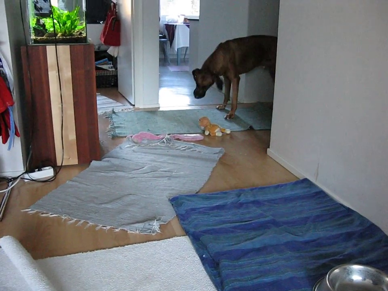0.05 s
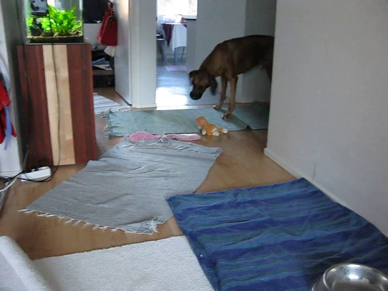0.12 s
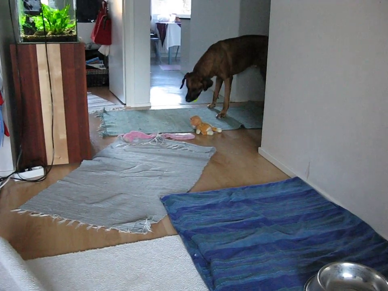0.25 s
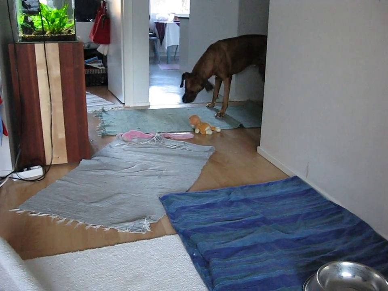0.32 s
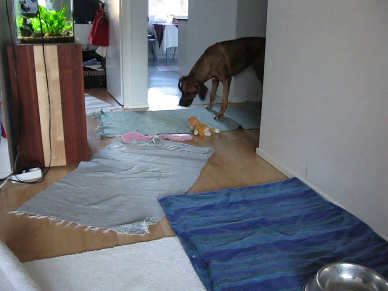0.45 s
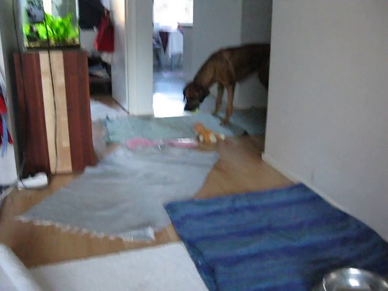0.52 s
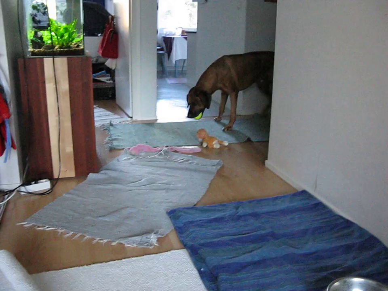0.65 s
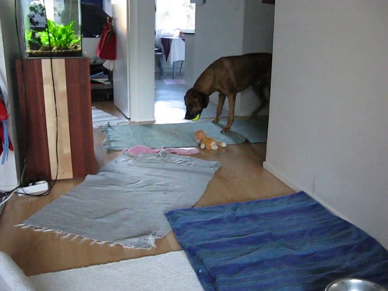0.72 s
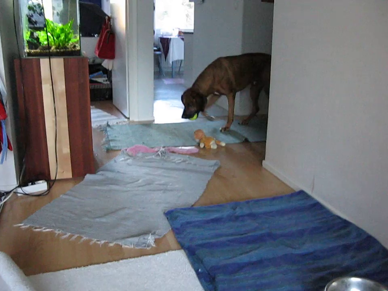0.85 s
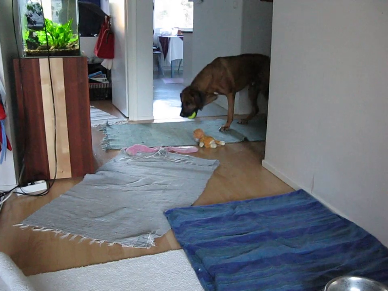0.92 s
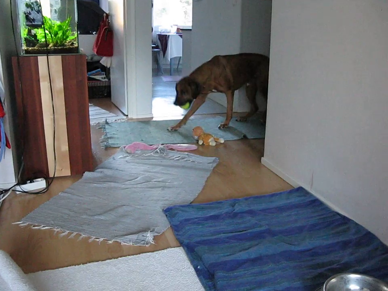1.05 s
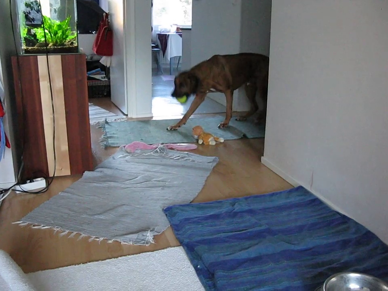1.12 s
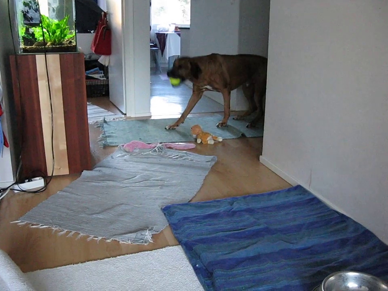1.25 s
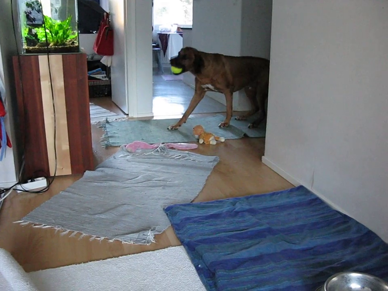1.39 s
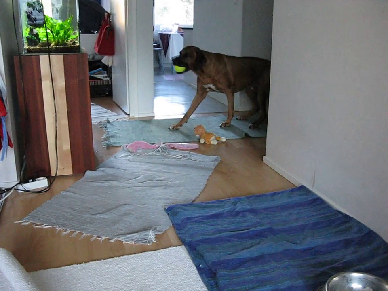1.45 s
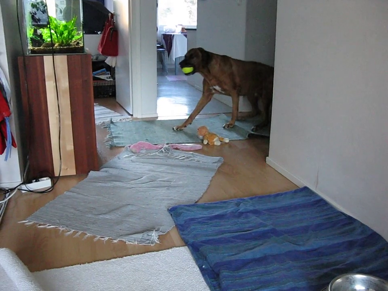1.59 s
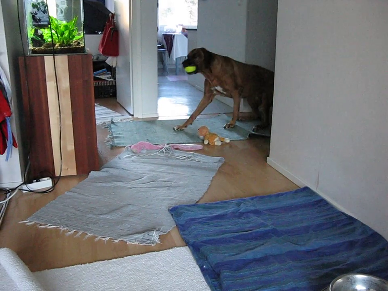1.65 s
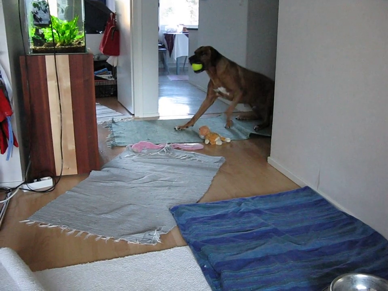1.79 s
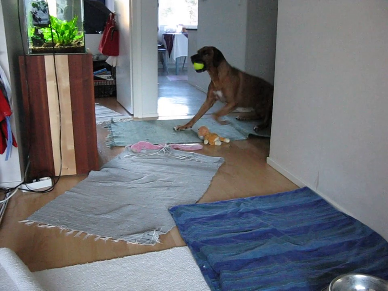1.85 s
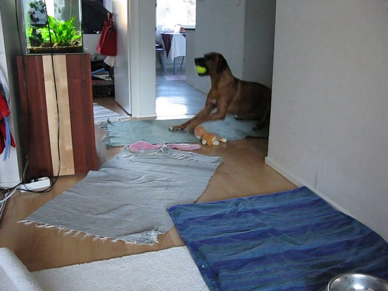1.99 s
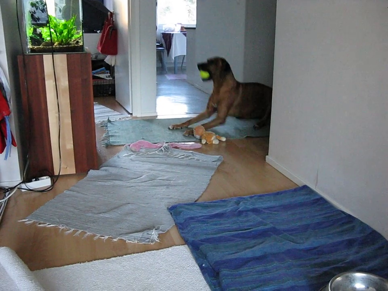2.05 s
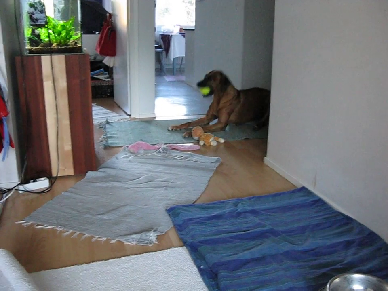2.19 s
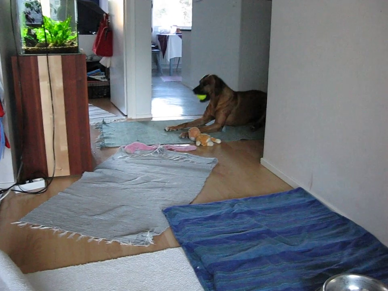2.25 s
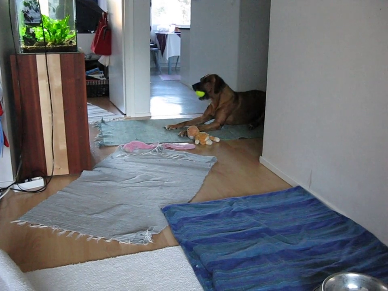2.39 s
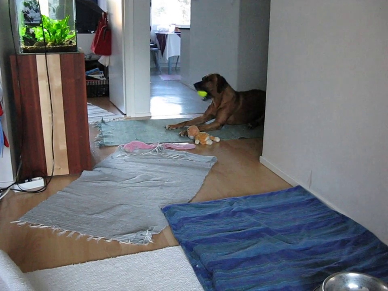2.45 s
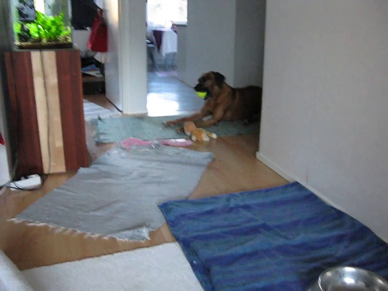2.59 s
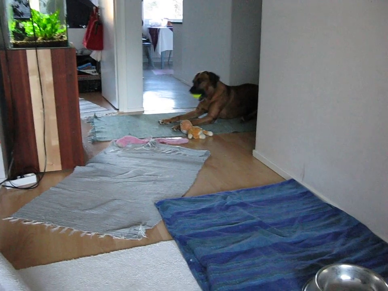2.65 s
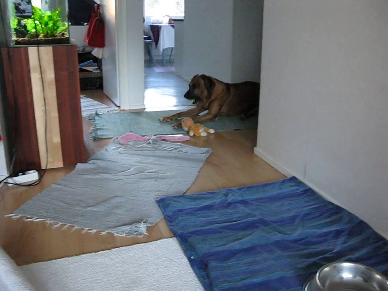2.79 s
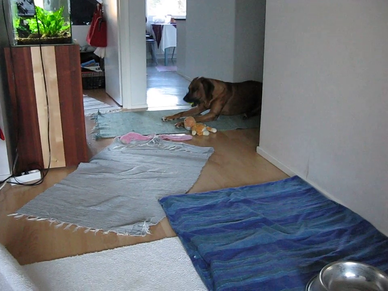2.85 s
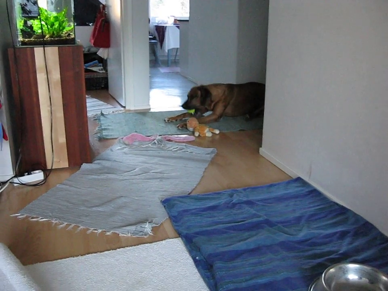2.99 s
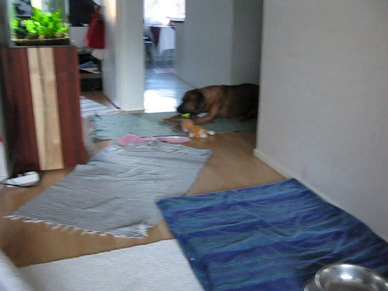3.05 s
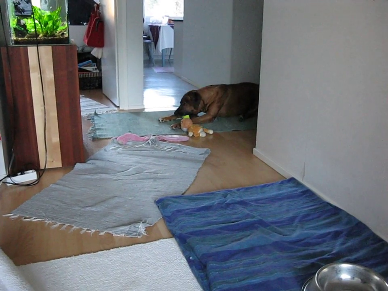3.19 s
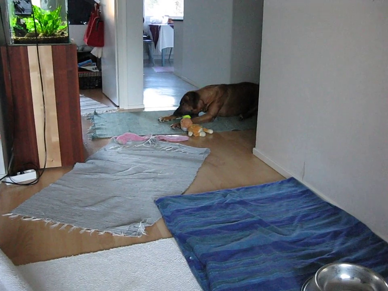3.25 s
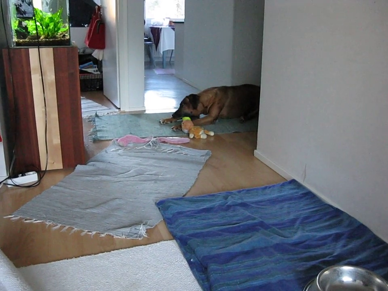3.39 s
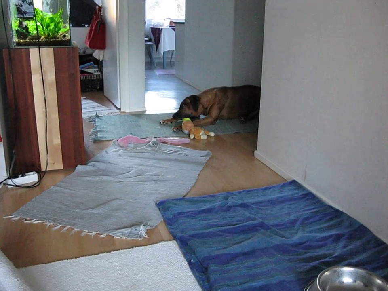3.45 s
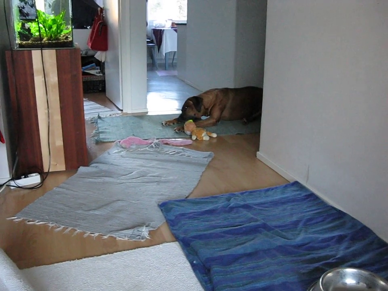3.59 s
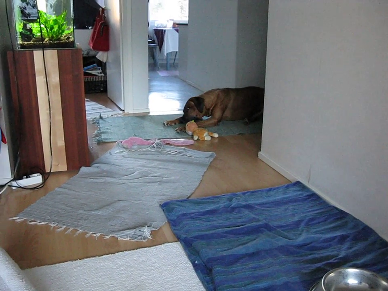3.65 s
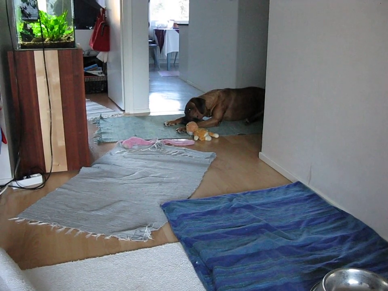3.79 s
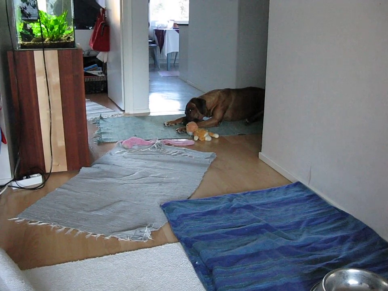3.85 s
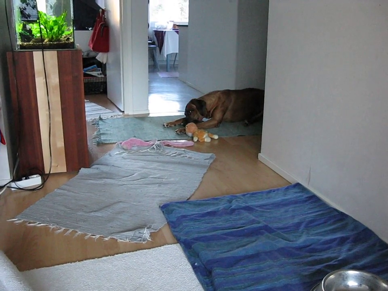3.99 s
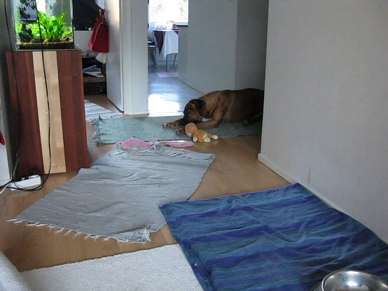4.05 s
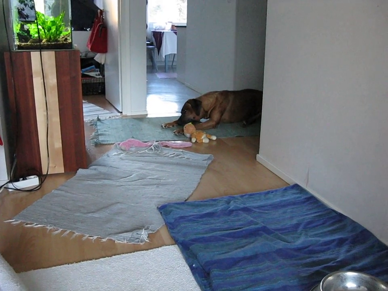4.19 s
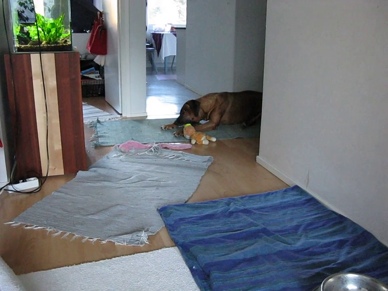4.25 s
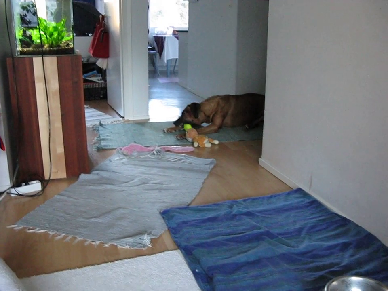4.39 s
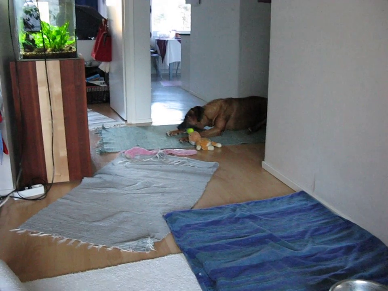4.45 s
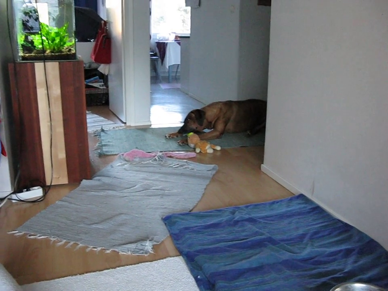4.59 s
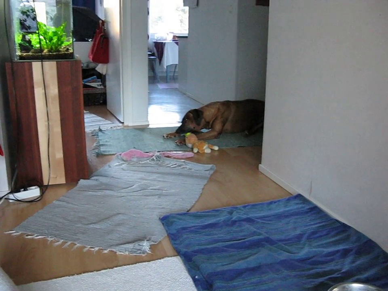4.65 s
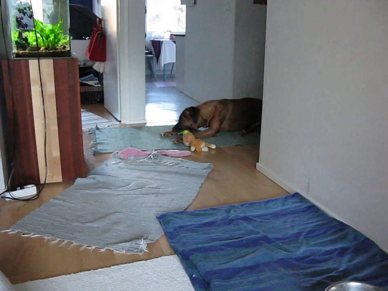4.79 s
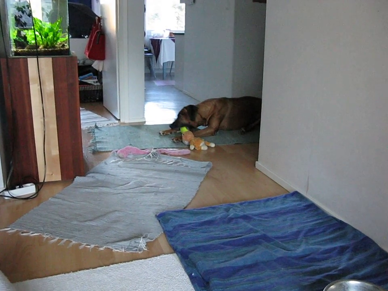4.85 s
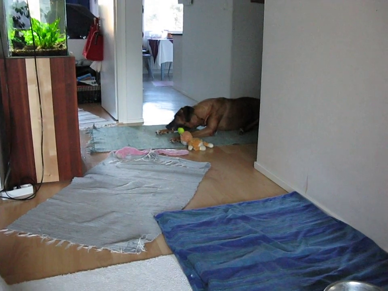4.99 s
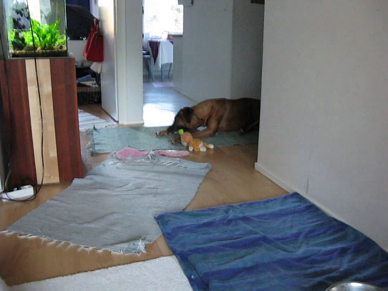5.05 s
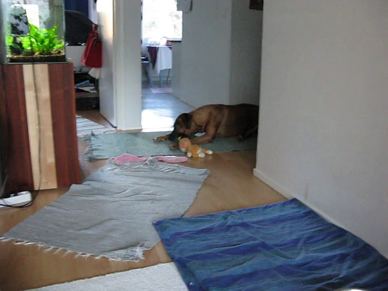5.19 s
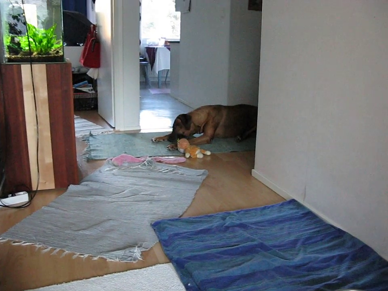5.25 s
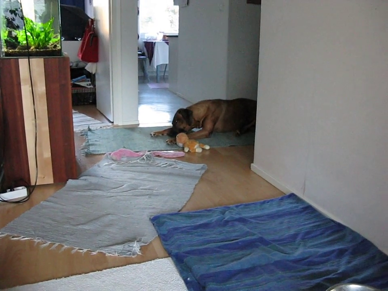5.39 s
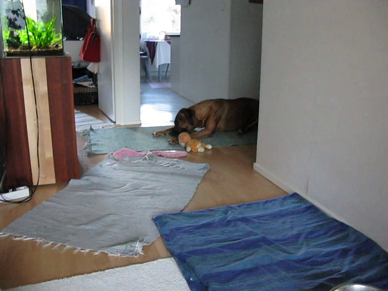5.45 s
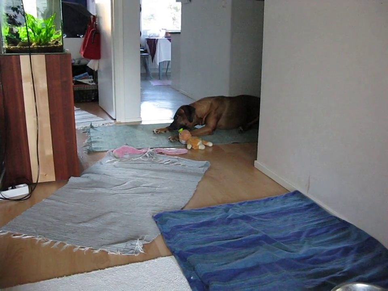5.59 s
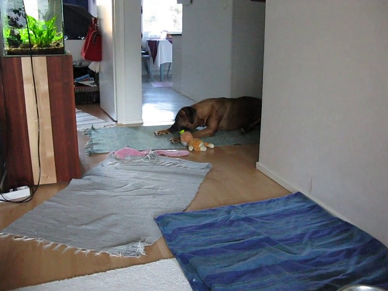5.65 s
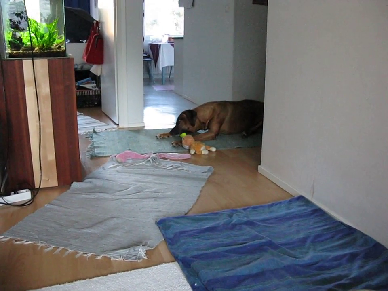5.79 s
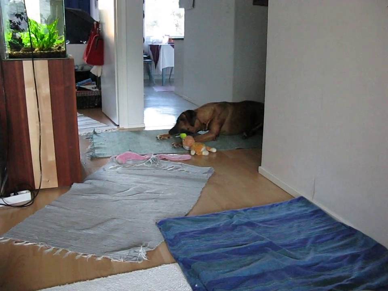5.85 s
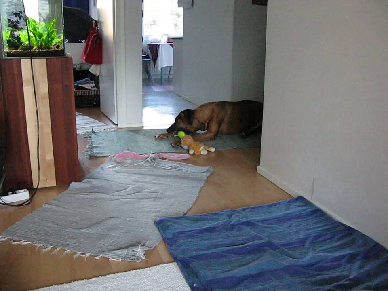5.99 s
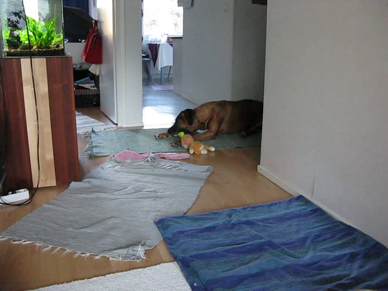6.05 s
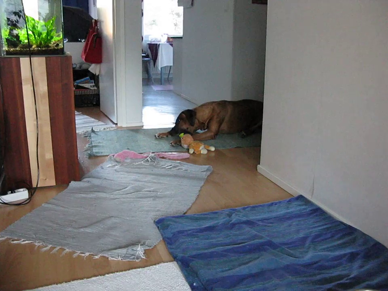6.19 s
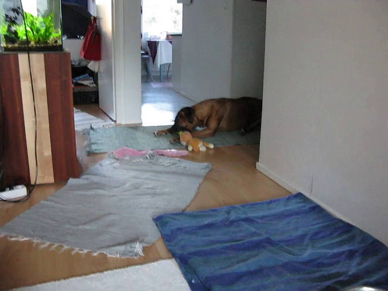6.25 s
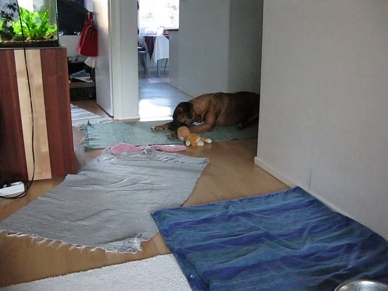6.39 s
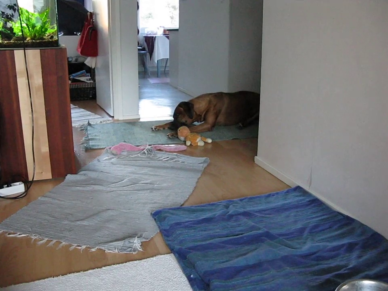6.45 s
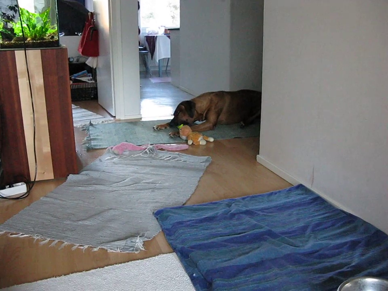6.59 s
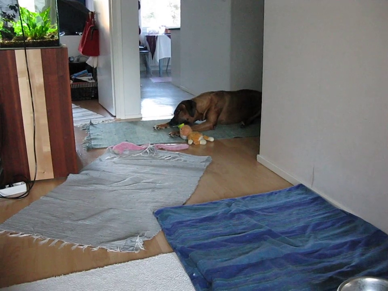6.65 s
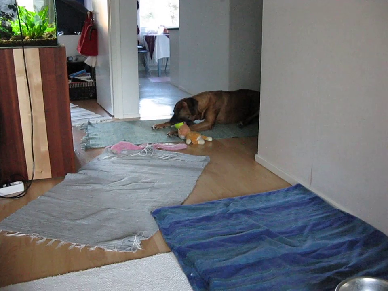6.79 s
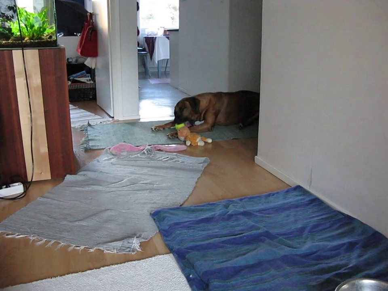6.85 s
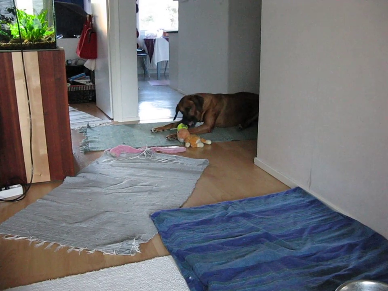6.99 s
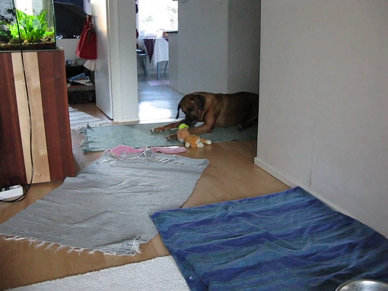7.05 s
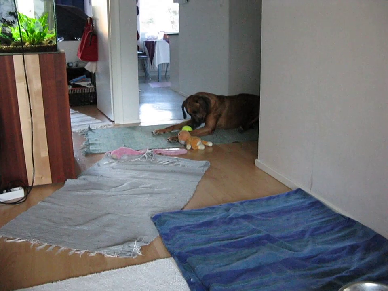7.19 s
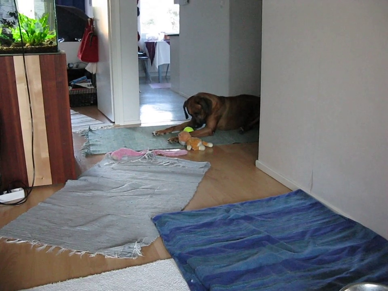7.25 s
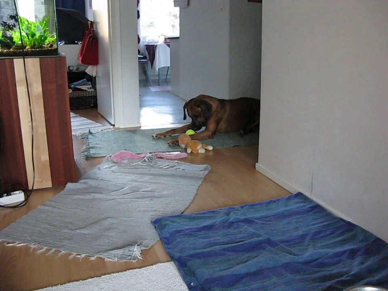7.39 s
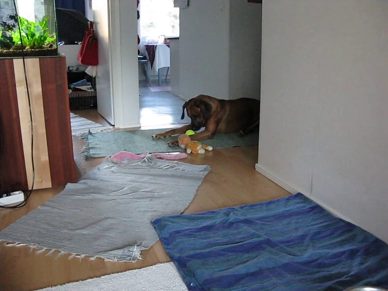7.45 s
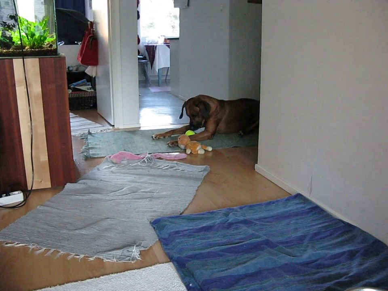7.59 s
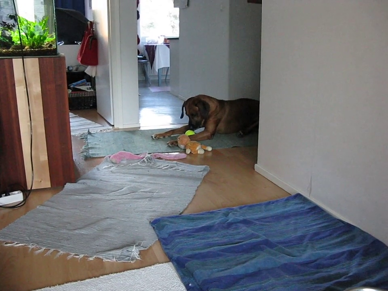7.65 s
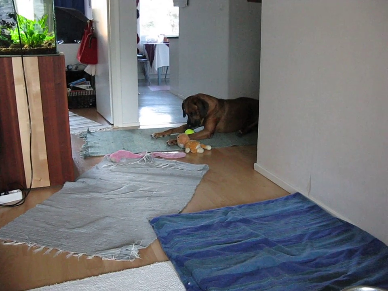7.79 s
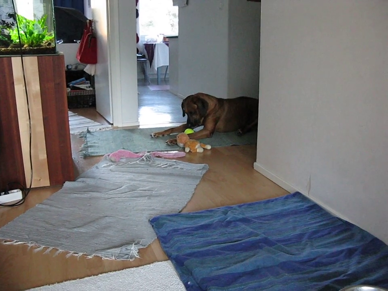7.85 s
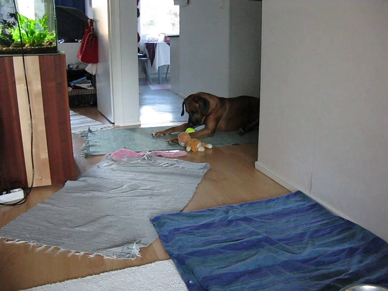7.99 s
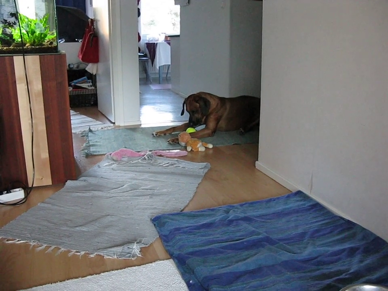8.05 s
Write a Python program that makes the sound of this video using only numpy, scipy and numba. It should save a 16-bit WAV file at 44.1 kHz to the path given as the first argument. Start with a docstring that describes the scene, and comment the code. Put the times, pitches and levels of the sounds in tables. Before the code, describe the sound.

Quiet room noise with faint low hum; a squeaky ball's thin wheeze dies at the very start. At 0.5 s a dog bites: a nasal reedy squeak climbs, shoots up, chokes in hiss, chirps at 0.73 and whines shrilly downward until 1.2. Soft paw rustle follows. A second loud bite at 1.4 repeats this, refilling until 2.2, as the dog lies down with a rustle and dull thump around 2.1. The third, at 2.7, eases and sinks, refilling around 3 amid close dry clicks. Duller bites come at 3.6, 5.1 and 6.1, each rising and hissing; chirps follow at 4.0, 5.5 and 6.5, with softer falling wheezes ending near 4.4, 6.0 and 6.9. Light rustling at 4.9, a click at 6.8, then quiet. The hard hallway rings; loud squeaks sound slightly squashed on a camera microphone metres away.

```python
"""A squeaky ball wheezes as it refills in a quiet hallway, then a dog bites it six times, shifting on the floor.
Bites drive air out through one reed, whose pitch climbs; in five of the six it chokes, hisses and chirps free
as the jaw opens, while the third eases and sinks. The ball refills through a second reed. Reeds are overtone
stacks plus pulsed air; leaks, paws and background are shaped noise. The room rings and the camera's limiter
rides the squeaks."""
import sys
import numpy as np
from scipy import signal
from scipy.fft import rfft, irfft, next_fast_len
from scipy.io import wavfile
from scipy.ndimage import uniform_filter1d
from numba import njit

SR = 44100
rng = np.random.default_rng(int(sys.argv[2]) if len(sys.argv) > 2 else 0)


def master(y):
    """Save y as 16-bit WAV."""
    cut = np.clip(np.atleast_2d(y).T, -1, 1)
    pcm = np.round(cut * 32767)  # scale
    wavfile.write(sys.argv[1], SR, pcm.astype(np.int16))


N = 358533
LEAD = SR // 4  # samples before time zero, so the room already rings
TIME = np.arange(-LEAD, N) / SR
TOP_HZ = 15900


def undb(db):
    """Decibels to gain."""
    return 10 ** (np.asarray(db) / 20)


def unit(x):
    """Scale to rms 1."""
    return x / np.sqrt(np.mean(x ** 2))


def gain_at(hz, points):
    """Read a (Hz, dB) spectrum on a log-frequency axis."""
    at_hz, db = np.transpose(points)
    return undb(np.interp(np.log(hz + 1), np.log(at_hz), db))


def noise(colour, size=len(TIME)):
    """Noise of rms 1 whose spectrum is the function colour(Hz)."""
    n = next_fast_len(size)
    f = np.arange(n // 2 + 1) * SR / n
    spectrum = rfft(rng.standard_normal(n)) * colour(f)
    return unit(irfft(spectrum, n)[:size])


def resonance(f, hz, width_hz):
    """Gain of one resonance, 1 at its centre."""
    return f * width_hz / np.hypot(f * width_hz, f ** 2 - hz ** 2)


def wander(rate_hz, size):
    """Smooth random curve of spread about 1."""
    return noise(lambda f: np.exp(-(f / rate_hz) ** 2), size=size + SR // 4)[:size]


def span(start_s, end_s):
    """Sample times from start to end."""
    return np.arange(start_s, end_s, 1 / SR)


def gate(t, rise_s, fall_s):
    """Fade in and out at the ends of the times t."""
    return np.clip((t - t[0]) / rise_s, 0, 1) * np.clip((t[-1] - t) / fall_s, 0, 1)


def add(out, start_s, x):
    """Mix x into out from the time start."""
    i = max(int(start_s * SR) + LEAD, 0)
    out[i:i + len(x)] += x[:len(out) - i]


# background spectrum: (frequency [Hz], relative level [dB])
FLAT_SPECTRUM = [(15, -51.5), (25, -16), (64, -10), (97, -8), (463, -10.5), (516, -9.5), (936, -11),
                 (1330, -13), (1940, -15.5), (2610, -16.5), (3520, -20), (4370, -20.5), (5570, -22),
                 (10700, -26.5), (16000, -35)]
# low hums: (middle [s], Gaussian half length [s], frequency [Hz], peak level [dB])
HUM_EVENTS = [(.2, 0.13, 66, -56.5), (1.72, .1, 66, -52), (4.992, .06, 112, -54), (7.3, 0.32, 106, -58)]
FLAT_DB = -50


def flat():
    """Steady noise of the quiet flat, plus faint low sine hums that swell and fade."""
    out = undb(FLAT_DB) * noise(lambda f: gain_at(f, FLAT_SPECTRUM))
    for middle, half, hz, db in HUM_EVENTS:
        swell = np.exp(-((TIME - middle) / half) ** 2 / 2)
        out += undb(db) * swell * np.sin(2 * np.pi * hz * TIME + wander(6, len(TIME)))
    return out


def strain(hz):
    """The harder a reed is blown, the higher and the less steady it sounds."""
    return np.minimum(hz / 1450, 2) ** 1.6


def reed(hz, treble_db, colour, jitter, air_db, split_db):
    """A beating reed: overtones on a slightly unsteady pitch, with a puff of air each cycle."""
    # overblown, the reed beats strong-weak: lines appear halfway between overtones
    split = undb(split_db + 2 * wander(30, len(hz))) * np.clip((hz - 1800) / 500, 0, 1)
    hz = hz * (1 + jitter * (wander(280, len(hz)) + 1.504 * wander(39, len(hz))))
    phase = 2 * np.pi * np.cumsum(hz) / SR
    k = np.arange(1, 26)[:, None] / 2  # half-integers are the split lines
    f = k * hz
    shelf = np.clip((f - 4800) / 2000, 0, 1)
    size = gain_at(f, colour) * undb(treble_db * shelf) * (f < TOP_HZ)
    size = size * np.where(k % 1 == 0, 1, split * np.minimum(f / 3800, 1) ** 2.5)
    tone = np.sum(size * np.cos(k * phase), axis=0) / np.sqrt(np.sum(size ** 2, axis=0) / 2)
    air = noise(lambda f: gain_at(f, colour) * np.clip(f / 1500, 0, 1) ** 6, size=len(hz))
    return tone + undb(air_db) * air * (1 + np.cos(phase) / 2)


# the ball springs back and draws air in: (start [s], strongest suction [s], end [s], rise constant [s],
# fall constant [s], resting pitch [Hz], pitch sought at the peak [Hz], resting level [dB],
# peak level before falter and sag [dB], treble shelf before suction and sag [dB], jaw sway [Hz])
REFILL_EVENTS = [(-.15, -.17, .022, .05, .05, 1510, 1900, -20.5, -19, 13, 0),
                 (.78, .825, 1.185, .05, .0565, 1460, 4150, -22, -6.5, 15.5, 0),
                 (1.76, 1.823, 2.165, .063, .051, 1476, 3330, -21.5, -6, 14.5, 0),
                 (2.925, 2.969, 3.195, .022, .048, 1509, 2790, -24, -11.5, 16.5, 0),
                 (4.085, 4.26, 4.425, .095, .0355, 1513, 1895, -22, -19, 6.5, 0),
                 (5.59, 5.86, 6.0, .022, .035, 1545, 1672, -27, -20, 9, 20),
                 (6.585, 6.732, 6.92, .04, .0315, 1545, 2450, -22.5, -17.5, 5.5, 0)]
# inlet reed overtones: (frequency [Hz], strength [dB])
INLET_REED = [(1450, 4.5), (1860, 4), (2300, 1), (3100, 2), (4600, 0), (6200, -7), (7700, -14.5),
              (9300, -7.5), (11000, -6), (12600, -5), (13700, -10.5), (14600, -22), (16000, -30)]
IN_SPLIT_DB = -5.5
REGISTER_HZ = 2540  # the reed sticks here until the suction peaks, then jumps
JUMP_DB, JUMP_S = -7, .014  # the tone falters at the jump
STUCK_AIR_DB = 18  # air rasps past a reed held below the pitch its suction calls for
LOCK_HZ, LOCK_FROM_HZ = 828, 2150  # blown hard, the pitch clings to multiples of LOCK_HZ
CLEAN_FROM_HZ, CLEAN_DB = 2900, -12  # the top register hardly beats strong-weak
SPENT_S, LAST_HZ, SPENT_DB, SPENT_TREBLE_DB = .055, 1340, -12, -7  # sag of the nearly full ball
SUCTION_TREBLE_DB = -5.5  # treble change at the strongest suction
JAW_RATE_HZ = 4  # a slowly opening jaw sways


def refill(start, peak, end, rise, fall, rest_hz, top_hz, rest_db, top_db, treble_db, sway_hz):
    """One release: suction swells and dies, carrying pitch and level; both sag as the ball fills."""
    t = span(start, end)
    rising = t < peak
    suction = 1 / np.cosh((t - peak) / np.where(rising, rise, fall))
    spent = np.exp((t - end) / SPENT_S)

    reach_hz = np.where(rising, min(top_hz, REGISTER_HZ), top_hz) * 1.
    reach_hz = uniform_filter1d(reach_hz, size=200, mode="nearest")
    hz = rest_hz + (reach_hz - rest_hz) * suction + (LAST_HZ - rest_hz) * spent
    hz = hz + sway_hz * np.sin(2 * np.pi * JAW_RATE_HZ * (t - start))
    cling = np.clip((hz - LOCK_FROM_HZ) / 300, 0, .55)
    hz = hz - cling * LOCK_HZ * np.sin(2 * np.pi * hz / LOCK_HZ) / (2 * np.pi)

    drive = suction * (reach_hz - rest_hz) / (top_hz - rest_hz)
    overblown = np.clip((top_hz - REGISTER_HZ) / LOCK_HZ, 0, 1)
    falter_db = JUMP_DB * overblown * np.exp(-((t - peak) / JUMP_S) ** 2)
    level_db = rest_db + (top_db - rest_db) * drive ** .7 + falter_db + SPENT_DB * spent ** 1.5
    bright_db = treble_db + SUCTION_TREBLE_DB * suction + SPENT_TREBLE_DB * spent
    tone = reed(hz, bright_db, INLET_REED, jitter=.0011 * strain(hz),
                air_db=-35 + STUCK_AIR_DB * overblown * rising,
                split_db=IN_SPLIT_DB + CLEAN_DB * (hz > CLEAN_FROM_HZ))
    return tone * undb(level_db) * gate(t, .008, .0013)


# paws and fur on the rug: (start [s], end [s], fade-in [s], nominal level [dB])
RUSTLE_EVENTS = [(0.272, 0.503, 0.033, -54.5), (1.055, 1.184, .01, -41), (1.246, 1.44, 0.034, -55),
                 (2.036, 2.15, 0.0067, -35.5), (2.159, 2.3, 0.018, -46), (2.42, 2.71, 0.061, -54),
                 (4.93, 5.123, 0.056, -44.5)]
# rubbing spectrum: (frequency [Hz], relative level [dB])
RUG_SPECTRUM = [(88, -35.5), (150, -14.5), (291, -9.5), (514, -1.5), (555, -6.5), (612, 1), (905, -6.5),
                (2020, -2.5), (11000, -13.5), (16000, -23)]


def rustles():
    """Paws and fur rub the rug: coloured noise with a fast random level, heard as grain."""
    out = np.zeros(len(TIME))
    for start, end, rise, db in RUSTLE_EVENTS:
        t = span(start, end)
        fibres = noise(lambda f: gain_at(f, RUG_SPECTRUM), size=len(t))
        grain = undb(3.1 * wander(90, len(t)))
        add(out, start, undb(db - 2.5) * fibres * grain * gate(t, rise, 0.093))
    return out


# last air into the ball: (start [s], end [s], level [dB])
SEEP_EVENTS = [(0.335, 0.504, -56), (1.29, 1.44, -51.5), (2.516, 2.71, -57)]


def seep():
    """Thin hiss through the inlet reed, the air too slow to sound it."""
    out = np.zeros(len(TIME))
    for start, end, db in SEEP_EVENTS:
        t = span(start, end)
        hiss = noise(lambda f: gain_at(f, INLET_REED) * np.minimum(f / 8000, 1) ** 2, size=len(t))
        add(out, start, undb(db) * hiss * gate(t, 0.05, 0.013))
    return out


# bites press air out: (start [s], buckling [s], end [s], buckling time constant [s], first pitch [Hz],
# creep [Hz/s], top pitch approached [Hz], level built up before buckling [dB],
# treble shelf before buckling [dB], time the reed sounds on as the jaw eases [s])
SQUEEZE_EVENTS = [(.489, .6707, .716, .0152, 1299, 1465, 3179, -10, 12, 0),
                  (1.418, 1.617, 1.662, .0265, 1275, 1420, 3375, -10.5, 10.5, 0),
                  (2.682, 2.8527, 2.885, .0204, 1301, 561, 1864, -13, 7, .035),
                  (3.638, 3.7422, 3.805, .0162, 1311, 1864, 3137, -16, -3, 0),
                  (5.085, 5.146, 5.19, .0095, 1315, 3300, 3070, -15, .5, 0),
                  (6.114, 6.2915, 6.342, .0198, 1288, 1060, 3131, -16.5, -1, 0)]
# outlet reed overtones: (frequency [Hz], strength [dB])
OUTLET_REED = [(1300, -3.5), (2700, -2), (4000, -4.5), (5300, -4.5), (6600, -4), (8000, 0.5), (9300, -2),
               (10500, -6), (12000, -15), (13200, -17.5), (14500, -26), (16000, -30)]
OUT_SPLIT_DB = -3
SQUEEZE_SWELL_DB, SQUEEZE_SWELL_S = 5.5, .05  # pressure builds after the teeth close
BUCKLED_DB, BUCKLED_TREBLE_DB = 3, -3  # change once the shell has given way
BUCKLED_AIR_DB = 26  # more air rushes past the reed as the shell buckles
EASE_S, EASED_HZ = .04, 1330  # an unfinished bite sinks towards this pitch


def squeeze(start, buckle, end, buckle_s, first_hz, creep, top_hz, db, treble_db, ease):
    """One bite: pitch creeps up with the pressure, then shoots up as the shell buckles; it sinks if the jaw eases."""
    t = span(start, end + max(ease, 0) + .0055)
    buckled = 1 / (1 + np.exp((buckle - t) / buckle_s))
    hz = (first_hz + creep * (t - start)) * (1 - buckled) + top_hz * buckled
    hz = hz + (EASED_HZ - hz) * np.clip(np.minimum(t - end, ease) / EASE_S, 0, 1)
    level_db = db - SQUEEZE_SWELL_DB * np.exp((start - t) / SQUEEZE_SWELL_S) + BUCKLED_DB * buckled
    tone = reed(hz, treble_db + BUCKLED_TREBLE_DB * buckled, OUTLET_REED, jitter=.0014 * strain(hz),
                air_db=-39.5 + BUCKLED_AIR_DB * buckled ** 3, split_db=OUT_SPLIT_DB)
    return tone * undb(level_db) * gate(t, .0013, .022)


# squeaker tube resonances: (frequency [Hz], width [Hz], level [dB])
TUBE_MODES = [(1520, 55, -6), (3020, 125, -2.5), (4690, 140, 1.5), (5880, 270, -7), (7400, 250, -1),
              (9300, 1000, -18.5), (10400, 400, -8)]


def tube(f):
    """Response of the squeaker's tube to rushing air."""
    power = sum((undb(db) * resonance(f, hz, width)) ** 2 for hz, width, db in TUBE_MODES)
    return np.sqrt(power) / (1 + (1150 / (f + 1)) ** 8) / (1 + (f / 12000) ** 8)


# air past the choked reed: (start [s], end [s], first level [dB], last level [dB])
LEAK_EVENTS = [(.70, 0.785, -19.5, -20), (1.654, 1.74, -16, -15), (3.788, 3.937, -14.5, -41.5),
               (5.166, 5.314, -23, -37), (6.326, 6.443, -23.5, -28)]


def leak(start, end, first_db, last_db):
    """Air leaks past the choked reed: noise ringing the tube."""
    t = span(start, end)
    level_db = np.linspace(first_db, last_db, len(t))
    return noise(tube, size=len(t)) * undb(level_db) * gate(t, 0.0079, 0.052)


# the choked reed springs free: (start [s], level [dB], length [s], pitch fall constant [s], treble shelf [dB])
CHIRP_EVENTS = [(.734, -8, .03, .015, 10), (1.717, -9.5, .029, .008, 10), (4.036, -13, .034, .0069, 1),
                (5.495, -11, .11, .009, 1), (6.526, -15, .062, .0072, 1)]


def chirp(length, glide, treble_db, start_hz=5600, end_hz=1180, decay=0.021):
    """Pressure collapses: the outlet reed dives, rattling, from its highest pitch towards its lowest."""
    t = span(0, length)
    hz = end_hz + (start_hz - end_hz) * np.exp(-t / glide)
    swell = np.minimum(t / 0.012, 1) ** 0.88 * np.exp(-np.maximum(t - .013, 0) / decay)
    rattle = 1 + .05 * wander(700, len(t)) * np.minimum(t / .015, 1)
    tone = reed(hz * rattle, treble_db, OUTLET_REED, jitter=0.01436, air_db=-25, split_db=-7)
    return tone * swell * gate(t, .001, 0.0081)


def ball():
    """Squeezes, leaks, chirps and refills of the squeaker."""
    out = np.zeros(len(TIME))
    for row in REFILL_EVENTS:
        add(out, row[0], refill(*row))
    for row in SQUEEZE_EVENTS:
        add(out, row[0], squeeze(*row))
    for row in LEAK_EVENTS:
        add(out, row[0], leak(*row))
    for start, db, length, glide, treble_db in CHIRP_EVENTS:
        add(out, start, undb(db) * chirp(length, glide, treble_db))
    return out


# the dog's weight on the floor: (start [s], level before fades and decay [dB], decay constant [s])
THUMP_EVENTS = [(1.1, -55, .06), (2.08, -47, 0.063), (2.145, -36.5, 0.042), (2.224, -45, 0.03),
                (2.32, -63, 0.088), (3.3, -53, 0.052), (4.96, -64, 0.066)]


def thumps():
    """The dog's weight lands on the floor: decaying noise through a dull 66 Hz resonance."""
    out, t = np.zeros(len(TIME)), span(0, 0.75)
    for start, db, decay in THUMP_EVENTS:
        boom = noise(lambda f: resonance(f, 66, 55) ** 2, size=len(t))
        add(out, start, undb(db) * boom * np.exp(-t / decay) * gate(t, 0.023, .05))
    return out


# clicks close to the microphone: (start [s], level before decay [dB], centre [Hz])
TICK_EVENTS = [(2.968, -36, 600), (3.004, -32, 700), (4.645, -48, 10100), (6.775, -29, 1500)]


def ticks():
    """Short dry clicks: broad resonant noise with a 4 ms decay constant."""
    out, t = np.zeros(len(TIME)), span(0, .05)
    for start, db, hz in TICK_EVENTS:
        click = noise(lambda f: resonance(f, hz, 2 * hz), size=len(t))
        add(out, start, undb(db) * click * np.exp(-t / .004))
    return out


# first echoes from floor, door frame and walls: (delay [s], level re direct [dB])
EARLY_ECHOES = [(.0013, -13.5), (.0034, -10), (.0059, -3.5)]
# the dog, head up, points the ball at the camera, then turns it to the floor:
# (time [s], tail level re direct [dB])
TAIL_SHARE = [(3.2, -2.5), (3.6, .5)]
ROOM_T60_S, ROOM_TREBLE_T60_S, ROOM_GAIN_DB = 0.44, 0.27, -1.3


def room(x):
    """Direct sound, a few near echoes, then a dense tail whose treble dies first."""
    t, tail = span(0, .7), 0
    edges_hz = np.linspace(0, SR / 2, 12)
    for lo, hi in zip(edges_hz, edges_hz[1:]):
        t60 = np.interp(lo, [2000, 12000], [ROOM_T60_S, ROOM_TREBLE_T60_S])
        band = noise(lambda f: (f >= lo) & (f < hi), size=len(t))
        tail = tail + band * np.exp(-np.log(1000) * t / t60)
    tail = tail * np.clip((t - .003) / 0.0019, 0, 1)
    tail = tail / np.sqrt(np.sum(tail ** 2))
    early = np.zeros(len(t))
    early[0] = 1
    for delay, db in EARLY_ECHOES:
        early[int(delay * SR)] += undb(db)
    spread = x * undb(np.interp(TIME, *np.transpose(TAIL_SHARE)))
    heard = signal.fftconvolve(x, early) + signal.fftconvolve(spread, tail)
    return undb(ROOM_GAIN_DB) * heard[:len(x)]


def scene():
    """Ball and dog in the room, over its quiet background."""
    in_room = room(ball() + seep() + rustles() + thumps())
    return (in_room + ticks() + flat())[None, LEAD:]


@njit
def follow(power, attack, release):
    """Envelope that rises fast and sinks slowly."""
    out, e = np.empty(len(power)), 0.
    for i in range(len(power)):
        e += (power[i] - e) / (SR * (attack if power[i] > e else release))
        out[i] = e
    return out


def record(dry, threshold_db=-16.3, treble_weight=.75, ratio=10, attack=0.0032, release=0.037, ahead=0.00067):
    """The camera's look-ahead limiter ducks loud squeaks, most under bright ones; the top is cut."""
    power = dry[0] ** 2 + (treble_weight * np.diff(dry[0], prepend=0)) ** 2
    envelope = np.sqrt(follow(power, attack, release))
    envelope = np.interp(np.arange(N) + ahead * SR, np.arange(N), envelope)
    gain = np.maximum(envelope / undb(threshold_db), 1) ** (1 / ratio - 1)
    low_pass = signal.ellip(10, .2, 70, TOP_HZ, fs=SR, output="sos")
    return signal.sosfilt(low_pass, dry * gain)


dry = scene()
out = record(dry)
master(out)
```